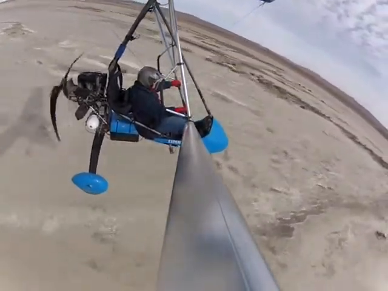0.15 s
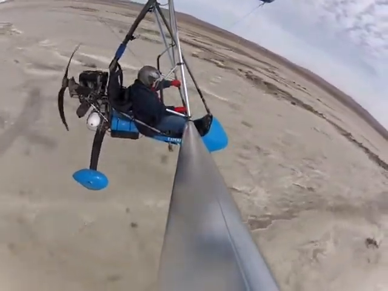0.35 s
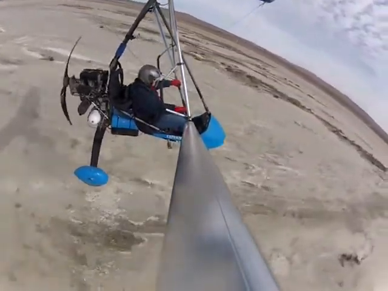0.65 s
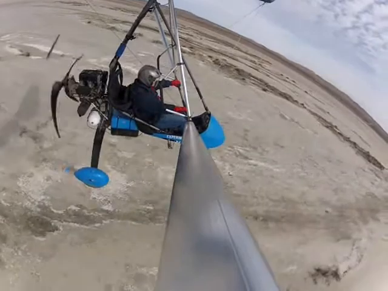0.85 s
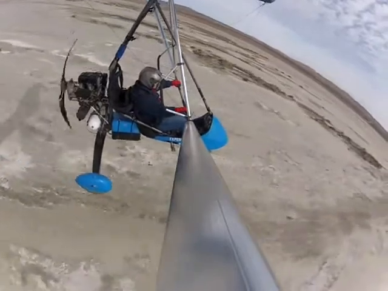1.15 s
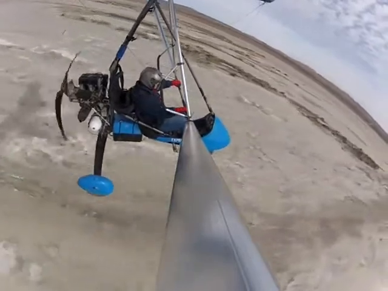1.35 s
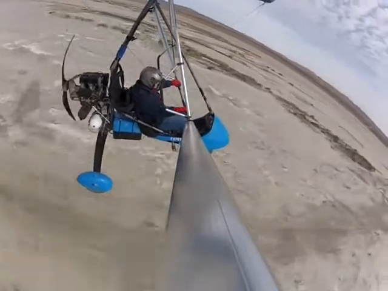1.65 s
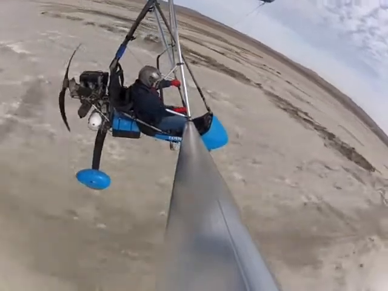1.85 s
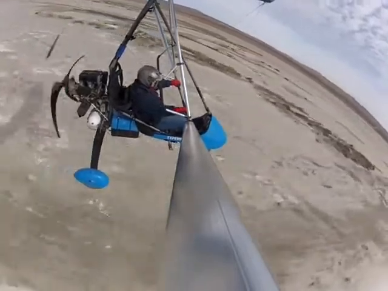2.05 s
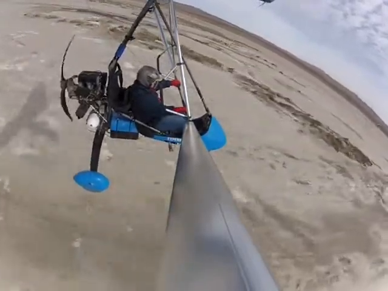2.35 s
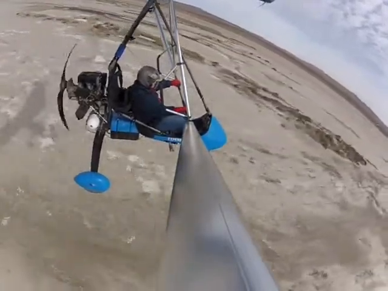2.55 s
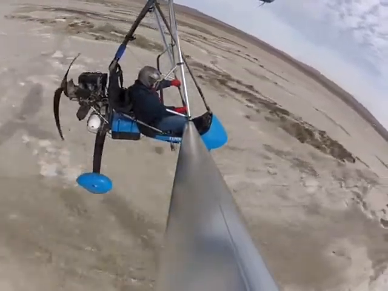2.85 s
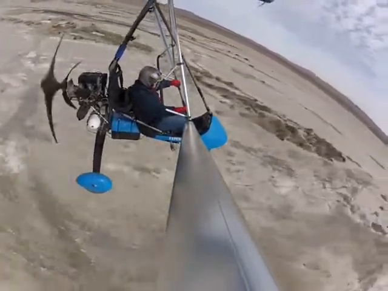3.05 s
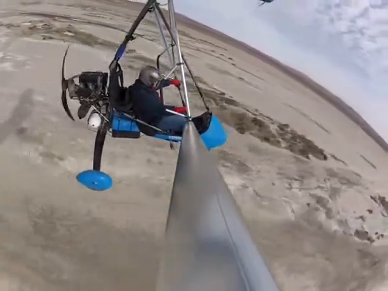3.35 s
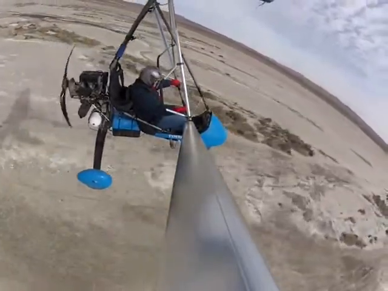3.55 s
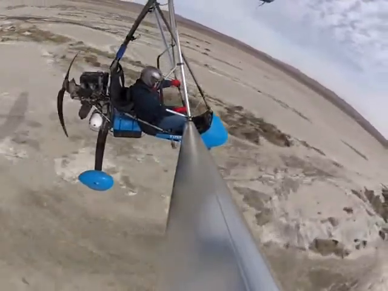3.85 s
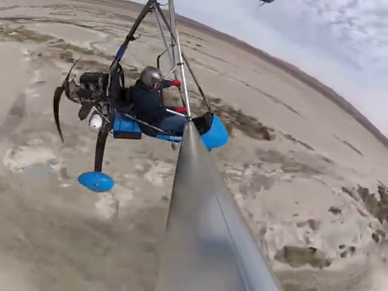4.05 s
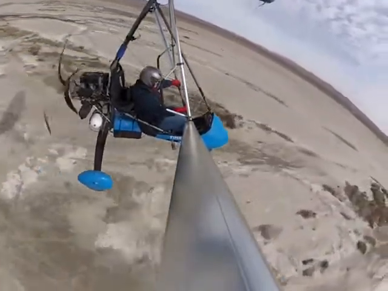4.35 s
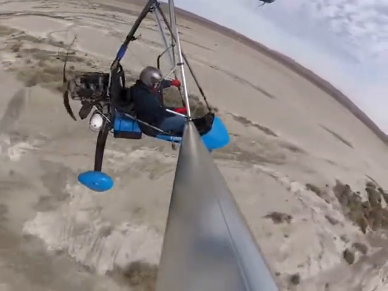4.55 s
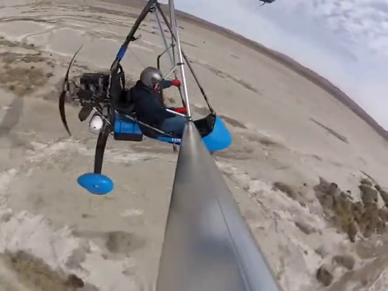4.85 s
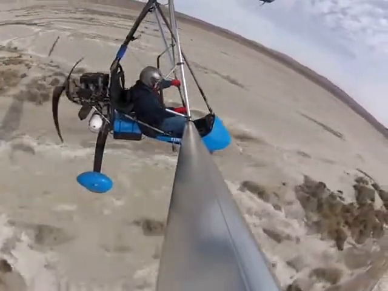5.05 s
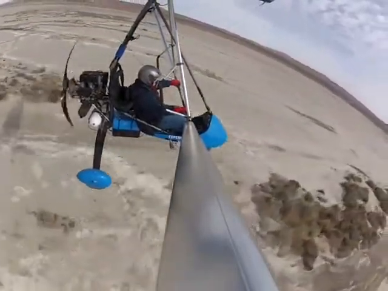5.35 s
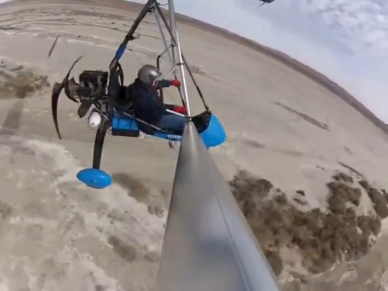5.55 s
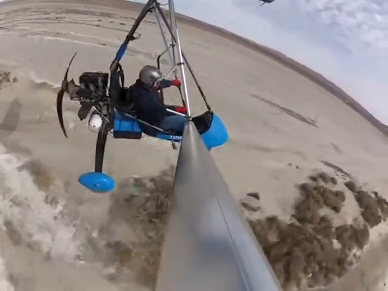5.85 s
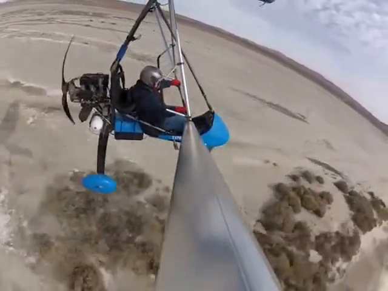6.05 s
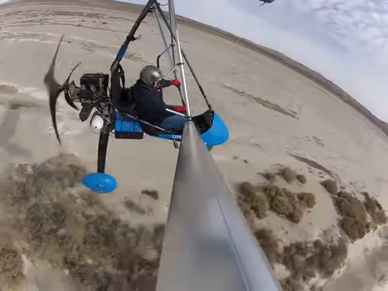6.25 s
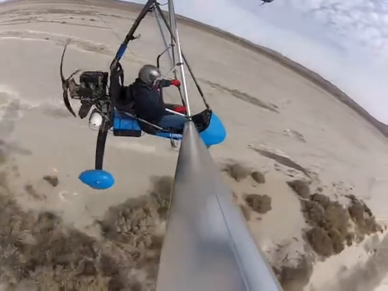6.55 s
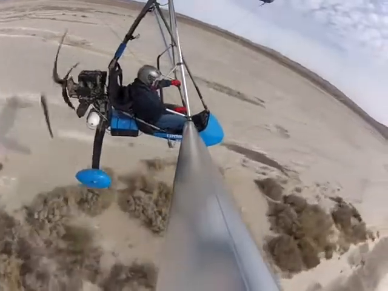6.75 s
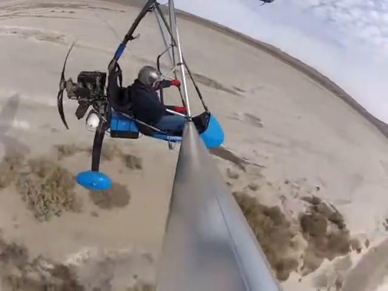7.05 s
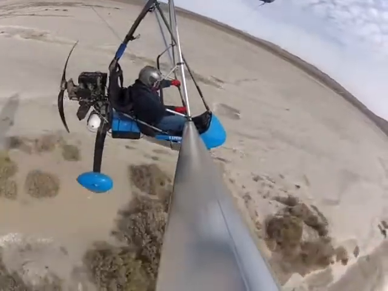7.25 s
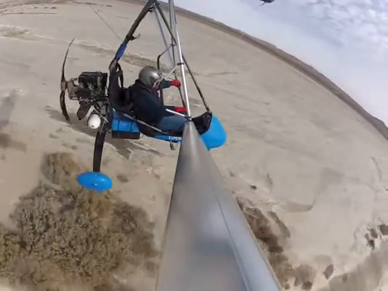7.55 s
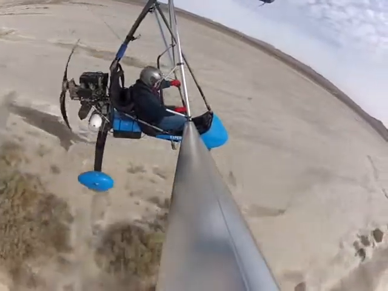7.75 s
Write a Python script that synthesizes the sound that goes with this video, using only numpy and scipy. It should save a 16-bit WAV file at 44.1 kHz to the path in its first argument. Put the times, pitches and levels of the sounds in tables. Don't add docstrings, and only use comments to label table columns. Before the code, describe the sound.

A small two-cylinder engine with a geared pusher propeller drones without a break, heard up close through a metal boom. Low firing hum, rough throb and thin metallic whine mix with rushing wind. The pitch creeps up until about the middle, then eases down to the end. The camera microphone is coarse and overloaded, crackling on a few gusty jolts.

```python
import sys
import numpy as np
from scipy import signal
from scipy.fft import rfft, irfft, next_fast_len
from scipy.io import wavfile
from scipy.ndimage import uniform_filter1d, minimum_filter1d, map_coordinates

SR = 44100
rng = np.random.default_rng(int(sys.argv[2]) if len(sys.argv) > 2 else 0)


def gain_from_db(level_db):
    decades = np.asarray(level_db, float) / 20
    return 10 ** decades


def dump_mix(stems):
    frames = np.atleast_2d(stems).T
    limited = np.clip(frames, -1, 1)
    pcm = np.round(limited * 32767).astype(np.int16)
    wavfile.write(sys.argv[1], SR, pcm)


N = 347508


def walk(rate_hz):
    hold = int(SR / rate_hz)
    held = np.repeat(rng.standard_normal(N // hold + 3), hold)
    slewed = uniform_filter1d(uniform_filter1d(held, hold), hold)
    return np.clip(1.315 * slewed[hold:hold + N], -2, 2)


def swells(rows):
    t = np.arange(N) / SR
    return sum(gain_db * np.exp(-((t - start_s) / half_s) ** 2) for start_s, half_s, gain_db in rows)


def response(hz, modes):
    power = 0
    for pitch_hz, width_hz, level_db in modes:
        detune = 2 * (hz - pitch_hz) / width_hz
        power = power + gain_from_db(level_db) ** 2 / (1 + detune ** 2) ** 2
    return np.sqrt(power)


def noise(modes):
    size = next_fast_len(N)
    white = rfft(rng.standard_normal(size)) * np.sqrt(SR / 2)
    hz = np.arange(len(white)) * SR / size
    return irfft(white * response(hz, modes), size)[:N]


def line(level_db, phase_rad):
    return np.sqrt(2) * gain_from_db(level_db) * np.cos(phase_rad)


# pitch_hz, width_hz, level_db, wander_db
BOOM_MODES = [
    (84.3, 25, -14.5, 0.64),
    (174.7, 15.4, -8.5, .5),
    (254.5, 39, -19.5, 1.3),
    (338, 35, -26.5, 0.7),
]
# start_s, half_length_s, gain_db
SHAKE_SWELLS = [(7.1, 0.15, -3.5)]
FIRING_SWELLS = [(.2, 0.31, -8), (.95, 0.11, -5.5), (1.45, 0.3, -8), (2.6, 0.28, -5.5), (3.9, 0.41, 2.5),
                 (4.35, 0.18, -2.5), (5.0, 0.19, -12), (5.35, .12, -2.5), (5.7, 0.24, 2.5), (6.2, .13, -6),
                 (6.75, 0.081, 3.5)]
THIRD_SWELLS = [(.53, 0.098, 11), (.75, .1, 9.5), (.92, 0.045, -4), (1.2, 0.12, 8), (1.48, 0.063, 13.5),
                (1.62, 0.047, -5), (2.25, 0.052, -3), (2.88, .07, 6), (3.14, 0.12, 9.5), (3.43, 0.13, 10.5),
                (3.73, 0.11, 8), (3.88, 0.059, -8), (4.95, 0.14, 4.5), (5.32, 0.067, -15), (5.5, .05, 4.5),
                (5.97, 0.1, 4.5), (6.17, .06, -7), (6.43, 0.16, -8.5), (7.1, 0.072, 3.5), (7.75, 0.3, -6)]
FOURTH_SWELLS = [(0, 0.093, 7.5), (.55, 0.34, 6.5), (1.12, 0.12, -15), (1.5, 0.21, 9.5), (1.98, 0.25, 6.5),
                 (2.24, 0.045, -14), (3.6, 0.23, -5), (4.35, 0.4, 1.5), (5.3, 0.48, 7.5), (6.18, 0.18, -12),
                 (6.55, 0.11, 3.5), (7.0, 0.075, 2)]


def shake(crank_rad, crank_hz):
    firing_lead_rad = 2.6 + 1.25 * np.arctan((crank_hz - 83.8) / 1.2)
    leads_rad = (0, firing_lead_rad, 0, np.pi)
    slips_rad = (.05, .25, 1.6, 1.2)
    echoes = (SHAKE_SWELLS, FIRING_SWELLS, THIRD_SWELLS, FOURTH_SWELLS)
    out = 0
    for i, (*mode, wander_db) in enumerate(BOOM_MODES):
        order = i + 1
        level_db = swells(echoes[i]) + wander_db * walk(6.0)
        phase_rad = order * crank_rad + leads_rad[i] + slips_rad[i] * walk(2.0)
        out = out + response(order * crank_hz, [mode]) * line(level_db, phase_rad)
    return out


GEAR = 2.62
# crank_order, shaft_order, level_db, wander_db
PROP_LINES = [(0, 1, -43, -4), (1, -1, -32, 1.5), (0, 3, -37, 2), (1, 1, -27, 2), (2, -1, -34, 3),
              (0, 6, -31, 4.5), (2, 1, -30, 3), (3, 1, -34.5, 5.5), (0, 12, -59, 4), (0, 15, -54.5, 7)]


def propeller(crank_rad):
    out = 0
    for crank_order, shaft_order, level_db, wander_db in PROP_LINES:
        phase_rad = (crank_order + shaft_order / GEAR) * crank_rad + 2.22 * walk(2.5)
        out = out + line(level_db + wander_db * walk(4.0), phase_rad)
    return out


# pitch_hz, width_hz, density_db_per_hz
BUFFET_MODES = [(30.4, 15.5, -37), (53.5, 13, -41), (117, 64, -45.5), (197.5, 46, -41.5),
                (265.4, 49.4, -38.5), (312, 54, -43.5), (415, 66, -59.5)]


def buffet():
    return sum(gain_from_db(1.9 * walk(3.087)) * noise([mode]) for mode in BUFFET_MODES)


# pitch_hz, width_hz, level_db
WHINE_MODES = [(2190, 130, -25), (2400, 260, -26.5), (3690, 284, -30), (4230, 82, -41), (4420, 73, -34.5),
               (4500, 60, -42.5)]
WHINE_ORDERS = (26, 28, 42, 52)
# start_s, half_length_s, gain_db
WHINE_SWELLS = [
    [(2.5, .4, -6), (4.75, .15, -5), (5.5, 0.22, -2), (7.0, 0.29, 2.5)],
    [(0, 0.15, 7.5), (.5, .15, -17), (2.12, 0.34, -8), (4.8, 0.31, 3), (5.4, 0.26, -3), (6.25, 0.18, -17), (6.75, 0.073, -16), (7.1, .2, 5.5)],
    [],
    [(1.3, 0.22, 4), (2.2, 0.35, -6), (4.75, .1, 4), (5.6, 0.32, -5), (6.5, 0.28, -12)],
]


def whine(crank_rad, crank_hz):
    out = 0
    for order, echo in zip(WHINE_ORDERS, WHINE_SWELLS):
        level_db = swells(echo) + 0.94 * walk(8.0)
        phase_rad = order * crank_rad + 2 * np.pi * rng.random()
        out = out + response(order * crank_hz, WHINE_MODES) * line(level_db, phase_rad)
    return out


# pitch_hz, width_hz, even_level_db, odd_level_db
KNOCK_MODES = [(415, 38, -55, -41.5), (514, 40, -48, -60), (691, 44, -50, -60), (852, 33, -39, -55),
               (966, 37, -50, -41.5), (1000, 83, -37.5, -55), (1122, 44, -55, -41.5), (1201, 110, -39, -33),
               (1400, 84, -34, -47), (1476, 100, -55, -44), (1572, 31, -33, -55), (1903, 70, -35.5, -41),
               (2060, 250, -36, -42), (2308, 140, -60, -31), (2494, 56, -35, -43.5), (2710, 80, -39, -52),
               (2993, 70, -60, -42), (3094, 80, -39, -39.5), (3170, 73, -51, -48), (3500, 89, -33, -57),
               (3620, 100, -51, -43), (3790, 115, -38.5, -66), (3900, 40, -39, -62), (4243, 132, -36, -66),
               (4450, 81, -39, -58), (4630, 80, -49, -62), (5430, 150, -49, -68), (5600, 350, -49.5, -63)]


def knock(crank_rad, crank_hz):
    out, step = 0, 512
    coarse = np.arange(0, N, step)
    for order in sorted(set(range(5, 67)) - set(WHINE_ORDERS)):
        modes = [(f, w, db[order % 2]) for f, w, *db in KNOCK_MODES]
        gain = np.interp(np.arange(N), coarse, response(order * crank_hz[::step], modes))
        phase_rad = order * crank_rad + 2 * np.pi * rng.random()
        out = out + gain * line(0.85 * walk(3.62), phase_rad)
    return out


BLADES = 3
# pitch_hz, width_hz, density_db_per_hz
FRAME_MODES = [(646, 220, -63), (728, 88, -57.5), (830, 87, -54), (961, 123, -52), (1046, 56, -58.5),
               (1128, 150, -56), (1249, 73, -49.5), (1348, 90, -55.5), (1458, 113, -53.5),
               (1540, 264, -53.5), (1876, 370, -57.5), (2082, 130, -52.5), (2213, 160, -50.5),
               (2394, 180, -51.5), (2575, 330, -61), (3027, 216, -58.5), (3300, 450, -63.5),
               (3613, 280, -58), (3786, 150, -62.5), (4060, 280, -68), (4266, 240, -67), (4450, 130, -64),
               (4720, 250, -67), (5080, 310, -69.5), (5330, 150, -71), (5685, 570, -67.5)]
# start_s, half_length_s, gain_db
FRAME_GUSTS = [
    (1.42, 0.16, 4),
    (2.5, 0.28, 1.5),
    (5.95, 0.16, 2),
]


def airflow(crank_rad):
    out = 0
    for k in range(0, len(FRAME_MODES), 4):
        start_rad = 2 * np.pi * rng.random(3)
        beat = 1 + 0.11 * np.cos(crank_rad + start_rad[0])
        beat = beat + 0.17 * np.cos(2 * crank_rad + start_rad[1])
        beat = beat + 0.12 * np.cos(BLADES / GEAR * crank_rad + start_rad[2])
        level_db = 0.65 * walk(1.27) + 0.79 * walk(14.0)
        if k == 0:
            level_db = level_db + swells(FRAME_GUSTS)
        out = out + beat * gain_from_db(level_db) * noise(FRAME_MODES[k:k + 4])
    return out


# start_s, swell_db
BOOM_JOLTS = [
    (0.4615, 4.5),
    (0.745, 2),
    (2.1495, 4.5),
    (3.588, 3.5),
    (4.62, 2),
]


def jolted(low):
    t = np.arange(N) / SR
    turn, travel = 600, 1.0
    give = minimum_filter1d(travel / np.maximum(abs(low), travel), turn)
    give = uniform_filter1d(give, turn)
    jolt_db = sum(db * np.exp(-((t - start_s) / .007) ** 2) for start_s, db in BOOM_JOLTS)
    return low * give * gain_from_db(jolt_db)


# start_s, crank_hz
CRANK_SPEED = [(0, 83.44), (.25, 83.72), (.5, 83.9), (1.15, 85.58), (1.45, 85.88), (1.82, 85.66),
               (2.2, 85.8), (2.45, 86.1), (2.92, 86.37), (3.65, 86.34), (4.12, 86.57), (4.82, 86.47),
               (5.35, 85.8), (6.1, 84.87), (6.58, 83.85), (7.05, 83.36), (7.45, 82.6), (7.88, 82.14)]


def scene():
    crank_hz = np.interp(np.arange(N) / SR, *np.transpose(CRANK_SPEED))
    crank_rad = 2 * np.pi * np.cumsum(crank_hz) / SR
    low = jolted(shake(crank_rad, crank_hz) + propeller(crank_rad) + buffet())
    high = whine(crank_rad, crank_hz) + knock(crank_rad, crank_hz) + airflow(crank_rad)
    return (low + high)[None]


def low_pass(x):
    return signal.sosfilt(signal.butter(12, 15770, fs=SR, output="sos"), x)


def record(dry):
    sample_hz, hold_ticks = 12000, 4
    smooth = signal.sosfilt(signal.ellip(6, .3, 40, 5800, fs=SR, output="sos"), dry)
    ticks = np.arange(0, N, SR / sample_hz)
    coarse = np.clip(map_coordinates(smooth[0], [ticks], order=3), -1, 1)
    held = signal.resample_poly(np.repeat(coarse, hold_ticks), 147, 160)[None, :N]
    hiss = gain_from_db(-67) * rng.standard_normal(held.shape)
    mix = signal.sosfilt(signal.ellip(12, .2, 70, 15270, fs=SR, output="sos"), held + hiss)
    return low_pass(np.clip(mix, -.994, .994))


dry = scene()
out = record(dry)
dump_mix(out)
```